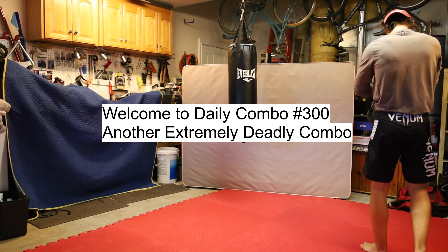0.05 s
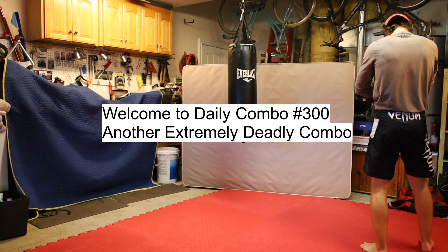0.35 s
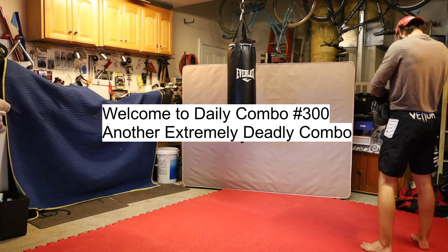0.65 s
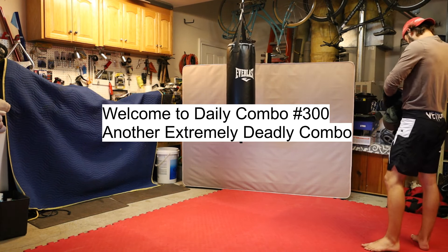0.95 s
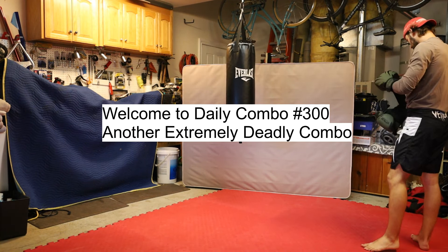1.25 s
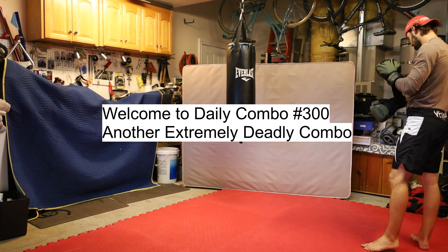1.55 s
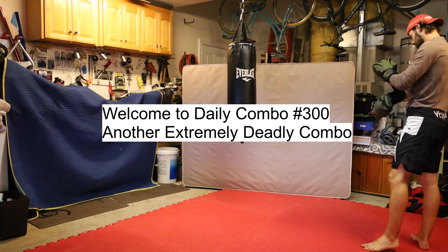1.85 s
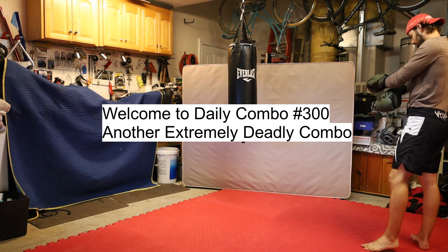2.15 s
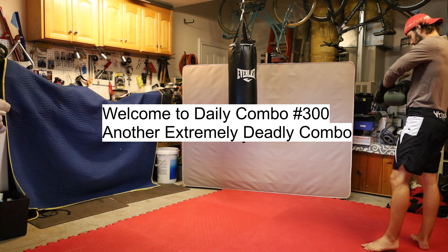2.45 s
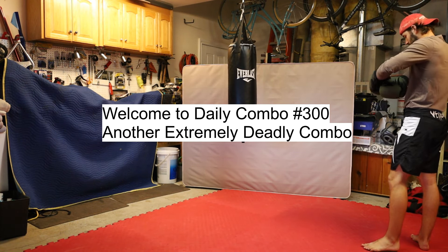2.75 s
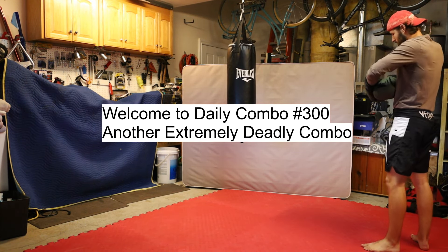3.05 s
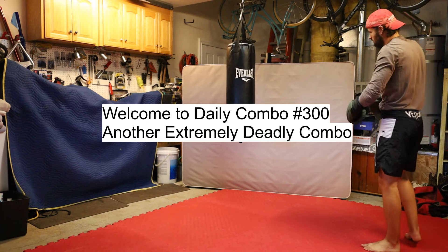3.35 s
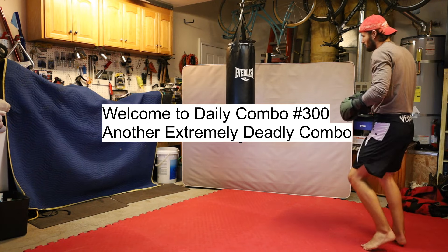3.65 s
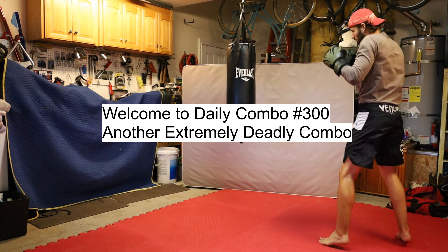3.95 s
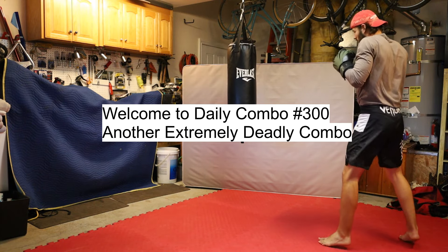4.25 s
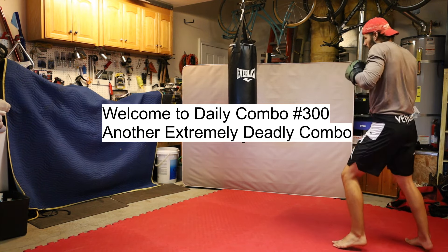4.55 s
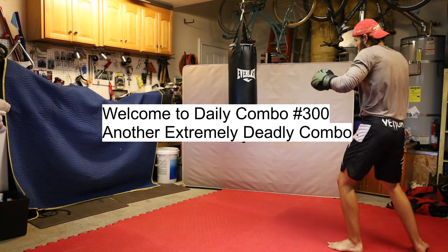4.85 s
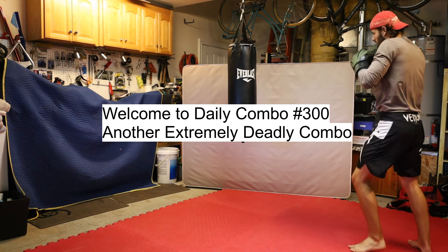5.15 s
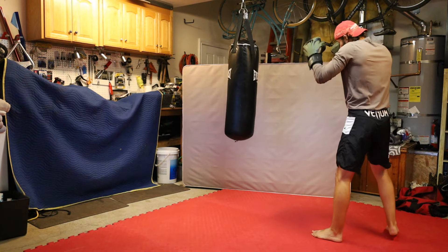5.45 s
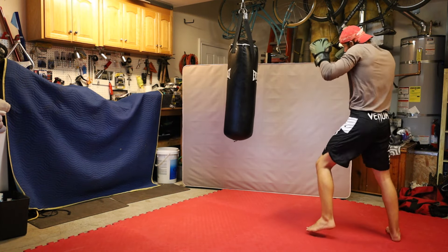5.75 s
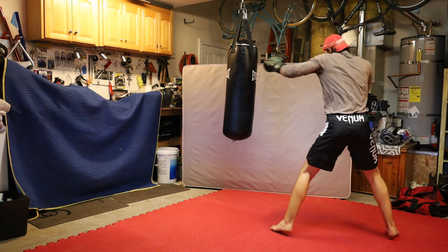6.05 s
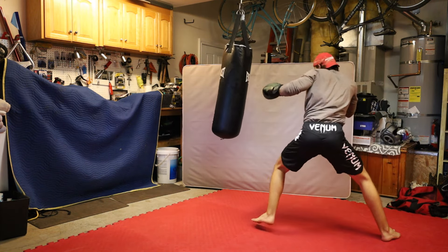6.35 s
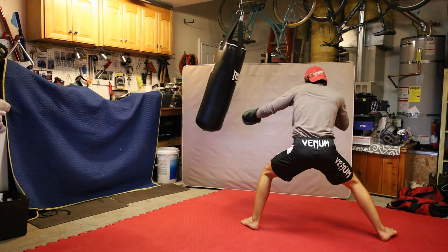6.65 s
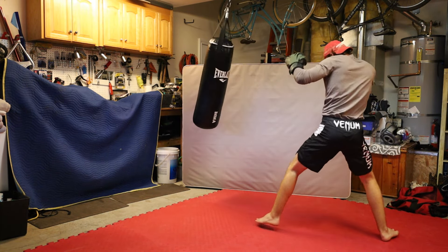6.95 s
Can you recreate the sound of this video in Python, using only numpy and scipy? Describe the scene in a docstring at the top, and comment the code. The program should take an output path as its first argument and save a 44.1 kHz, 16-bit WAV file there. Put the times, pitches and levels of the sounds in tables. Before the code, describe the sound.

After soft shuffling and glove handling in a garage, two loud punches slap into a heavy bag and its steel chain clinks.

```python
"""Heavy bag in a garage gym

A boxer rips open the hook-and-loop straps of his gloves, shuffles barefoot over foam mats and knocks
the gloves together. Two hard punches follow: each is a slap of squeezed air, a crack of leather and
the boom of the hanging bag. Its steel chain clinks and squeaks, and the ceiling mount rattles and
rumbles. Under the short, cluttered room sound lie still air and a faint mains hum."""
import sys
import numpy as np
from scipy import signal
from scipy.fft import rfft, irfft, next_fast_len
from scipy.io import wavfile

SR = 44100
rng = np.random.default_rng(int(sys.argv[2]) if len(sys.argv) > 2 else 0)


def to_wav(sig):
    """Store sig (one row per channel, or 1-D mono) as 16-bit WAV at the path in sys.argv[1].

    Samples outside -1..1 are clipped; the rate is SR.
    """
    pcm = np.clip(np.atleast_2d(sig), -1, 1) * 32767
    pcm = np.round(pcm).astype(np.int16)
    wavfile.write(sys.argv[1], SR, pcm.T)  # frames by channels


N = 312669
TIME = np.arange(N) / SR
STROKE = TIME[:SR // 2]   # time within one short sound

# one knock glove on glove, then two punches on the bag: (time [s], slap [dB], thump [dB], crack [dB])
GLOVE_HITS = [(4.1158, -18, -17, -38.5), (6.1682, 3.5, 2, -21.5), (6.5374, -4, -1.5, -22.5)]
# pressure pulses in one slap, contacts and near reflections: (delay [s], height [ratio], width [s])
SLAP_PULSES = [(0, 0.52, 0.0001), (.0021, 0.73, 0.00004), (.0025, 0.55, 0.00011), (.0068, 0.16, 0.00012),
               (.008, .55, .00005), (0.013, 0.19, 0.00014), (0.0267, 0.23, 0.000053)]
# tone of the leather crack: (frequency [Hz], level [dB])
LEATHER_EQ = [(40, -34), (120, 1.5), (280, -1), (500, -2), (900, -3), (1600, -5.5), (3500, -13),
              (7000, -19.5), (16000, -33)]
# boom of the bag and the garage air: (frequency [Hz], level [dB], t60 [s])
BOOM_MODES = [(55, -52, 0.41), (82.3, -22, 0.27), (102, -25.5, 0.2), (162.3, -18.5, 0.35),
              (205.6, -16, 0.14), (259, -16, 0.12), (292, -22, 0.26), (424, -27.5, 0.22), (447, -33, 0.2),
              (541, -38, 0.14), (692, -24, 0.14), (745, -27, 0.15)]


def glove_hits(low_cut_hz=170, crack_t60=0.31, boom_lag_s=0.00088):
    """The glove squeezes air out in sharp pulses, leather cracks, and the thump rings the low modes."""
    slaps, cracks, thumps = np.zeros((3, N))
    t = TIME[:SR // 3]
    for s, slap_db, thump_db, crack_db in GLOVE_HITS:
        for delay, height, width in SLAP_PULSES:
            add(slaps, s + delay, -from_db(slap_db) * height * t / width * np.exp(1 - t / width))
        leather = coloured(rng.standard_normal(len(t)), LEATHER_EQ)
        add(cracks, s, leather * from_db(crack_db - 60 * t / crack_t60))
        add(thumps, s + boom_lag_s, from_db([thump_db]))
    boom = sum(from_db(db) * ring(thumps, hz, t60) for hz, db, t60 in BOOM_MODES)
    return band(slaps, low_cut_hz, 11500, order=1), cracks, boom


# links snapping tight: (time [s], level [dB])
CHAIN_CLINKS = [(6.2086, -19), (6.308, -13.5), (6.3524, -20.5), (6.4212, -18.5), (6.439, -23), (6.462, -22),
                (6.599, -22), (6.6161, -15), (6.715, -45), (6.801, -34), (6.8218, -22), (6.9186, -27),
                (7.078, -34)]
# bright ring of a steel link: (frequency [Hz], level [dB], t60 [s])
LINK_MODES = [(3680, -2.5, 0.062), (3870, -13, 0.045), (4370, 1.5, 0.044), (5760, -29, 0.058),
              (6840, -24, 0.068), (7100, -14, 0.045), (8800, -8, 0.074), (9530, -11, .03), (9900, -16, .04),
              (11300, -3, 0.044), (11550, -5.5, 0.039), (12300, -11, 0.036), (13000, 2.5, .02),
              (14800, -2, 0.029), (15300, -16, 0.018)]
# a link squeaking in its hook: (time [s], length [s], pitch [Hz], level [dB])
HOOK_SQUEAKS = [(6.277, 0.03, 12080, -31), (6.87, 0.033, 6880, -44.5), (6.871, 0.06, 3480, -40)]


def chain(tick_db=-2, tick_t60=0.016, ring_db=-9, detune=0.022):
    """Each clink is a tick plus the ring of a slightly different link; the hook squeaks in pure tones."""
    out, t = np.zeros(N), TIME[:SR // 4]
    for s, db in CHAIN_CLINKS:
        steel = np.zeros(len(t))
        for hz, mode_db, t60 in LINK_MODES:
            strength, polarity, tuning = rng.standard_normal(3)
            tone = np.sign(polarity) * np.sin(2 * np.pi * hz * (1 + detune * tuning) * t)
            steel += tone * from_db(mode_db + 2 * strength - 60 * t / t60)
        tick = rms_one(band(rng.standard_normal(len(t)), 2100, 12300))
        tick *= from_db(tick_db - 60 * t / tick_t60)
        add(out, s, from_db(db) * (from_db(ring_db) * steel + tick))
    for s, length, hz, db in HOOK_SQUEAKS:
        gate = np.clip(np.minimum(t, length - t) / .003, 0, 1)
        add(out, s, from_db(db) * np.sin(2 * np.pi * hz * t) * gate)
    return out


# the bag dropping back into its chain: (time [s], rumble [dB], chatter [dB])
BAG_DROPS = [(6.413, -30, -28), (6.893, -38, -37)]
# midrange chatter of the bracket: (frequency [Hz], level [dB])
BRACKET_EQ = [(200, -10.5), (420, -5), (850, -7.5), (1300, -2), (1600, -0.5), (2000, -3), (2800, -5.5),
              (4000, -10.5), (5500, -17.5), (9000, -19.5), (16000, -32)]
# sparkle of slack links: (frequency [Hz], level [dB])
JINGLE_EQ = [(2000, -2), (4000, 9.5), (7000, 10), (12000, 7), (16000, -11)]
# low rumble of the joists: (frequency [Hz], level [dB])
JOIST_EQ = [(25, -31), (55, -14), (95, -5.5), (130, -1), (175, 2), (260, -12), (450, -6.5), (900, -28)]


def ceiling_mount(chatter_db=-24.5, clash_db=-27, clash_hz=2200, jolt_db=-30, jingle_t60=0.19):
    """The swinging bag makes the bracket chatter, the slack links jingle and the joists rumble."""
    chatter, clash, rumble = np.zeros((3, N))   # envelopes
    for s, *_ in GLOVE_HITS[1:]:   # the hits that land on the bag
        swing = swell(TIME - s, rise_s=0.11, hold_s=0.068, fade_t60=0.56)
        chatter += from_db(chatter_db) * swing
        clash += from_db(clash_db) * swing ** 3   # brighter at the height of the swing
        rumble += from_db(jolt_db) * swell(TIME - s, rise_s=0.01, fade_t60=0.21)
    for s, drop_rumble_db, drop_chatter_db in BAG_DROPS:
        load = swell(TIME - s, rise_s=0.011, hold_s=0.033, fade_t60=0.65)
        chatter = np.hypot(chatter, from_db(drop_chatter_db) * load)
        rumble = np.hypot(rumble, from_db(drop_rumble_db) * load)
    jingle = from_db(-18) * chatter
    for s, db in CHAIN_CLINKS:   # slack links jingle on softly after each clink
        add(jingle, s, from_db(db - 18.5 - 60 * STROKE / jingle_t60))
    bracket = chatter * coloured(grains(N, 5000, 0.95), BRACKET_EQ)
    bracket_ring = rms_one(ring(grains(N, 3400, 2.5), hz=1450, t60=0.0074))
    bracket += from_db(-14) * chatter ** 0.83 * bracket_ring   # the ring outlasts the chatter
    steel = clash * rms_one(band(grains(N, 2500, 1.3), clash_hz / 1.8, clash_hz * 1.54))
    links = jingle * coloured(grains(N, 450, 2.7), JINGLE_EQ)
    joists = rumble * coloured(rng.standard_normal(N), JOIST_EQ)
    return bracket + steel + links + joists


# hook-and-loop straps ripping open:
# (time [s], length [s], start level [dB], end level [dB], centre [Hz], hiss [dB], body [dB])
STRAP_RIPS = [(0.859, 0.08, -30.5, -25, 2550, -8, -12.5), (1.022, 0.0095, -28, -24, 2490, -12.5, -12.5),
              (1.161, 0.075, -28, -19, 2030, -3, -8)]


def straps():
    """The hooks tear loose in a coarse crackle that grows with the pull until the strap comes free."""
    out = np.zeros(N)
    for s, length, start_db, end_db, hz, hiss_db, body_db in STRAP_RIPS:
        pull = from_db(np.interp(STROKE, [0, length], [start_db, end_db]))
        crackle = friction(hz, hiss_db, body_db, per_s=1500, spread_db=3.0, width=1.484,
                           body_hz=(450, 800), body_order=1)
        add(out, s, crackle * pull * swell(STROKE, rise_s=0.0021, hold_s=length, fade_t60=0.19))
    return out


# gloves and feet patting down: (time [s], snap [dB], brush [dB], centre [Hz], hiss [dB], body [dB])
CONTACT_PATS = [(.053, -23, -44.5, 1700, -3, -8), (1.033, -17, -37, 2510, -2, -6.5),
                (2.107, -33, -47.5, 1280, -16, -4), (2.31, -23, -38, 1620, -16.5, -22),
                (3.2019, -21, -36, 3300, -7.5, -16), (3.3644, -21.5, -42.5, 2130, -0.5, -8),
                (3.609, -24.5, -43, 1250, -10, -2), (3.981, -26.5, -42, 1480, -0.5, -6),
                (4.272, -34, -52, 1400, 7, -16), (4.353, -23.5, -38, 1710, 0, -10),
                (5.031, -29.5, -43.5, 1700, -0.5, -10), (5.1321, -14.5, -36, 1130, -7, -5.5),
                (5.365, -23, -48, 1440, -1, -7), (5.596, -22, -38, 1130, -12.5, -10.5),
                (6.081, -25, -35, 1260, -14, -7)]
# fine top-end hiss of skin and vinyl: (frequency [Hz], level [dB])
SHEEN_EQ = [(300, -40), (1500, -32), (3000, 2), (5500, 1), (8000, 1.5), (12000, -8), (16000, -9.5)]


def pats(snap_t60=0.0057):
    """A glove or sole touches with a click and a quick double snap, then brushes along."""
    out, touch = np.zeros(N), signal.unit_impulse(len(STROKE))
    for s, snap_db, brush_db, hz, hiss_db, body_db in CONTACT_PATS:
        click = ring(touch, hz, t60=0.0018) + from_db(hiss_db + 3) * band(touch, 5000, 16000)
        add(out, s, from_db(snap_db - 1.5) * click)
        # the edge lands first, the rest of the surface just after and brighter
        for delay_s, trim_db, pitch_ratio in ((0, -3, 1), (0.0044, -2, 1.56)):
            snap = friction(hz * pitch_ratio, hiss_db, body_db, per_s=30000, spread_db=-1.5,
                            width=1.39, hiss_eq=SHEEN_EQ)
            add(out, s + delay_s, snap * from_db(snap_db + trim_db - 60 * STROKE / snap_t60))
        brush = friction(hz, hiss_db, body_db, per_s=3700, spread_db=5.0, width=1.64)
        add(out, s, brush * from_db(brush_db) * swell(STROKE, rise_s=0.0032, fade_t60=0.32))
    return out


# bright swishes of bare soles and glove cuffs: (time [s], rise [s], level [dB], centre [Hz], body [dB])
SLIDE_SWISHES = [(.481, 0.025, -42.5, 1050, -8), (.655, 0.036, -45, 1350, -25),
                 (2.405, 0.079, -39, 1830, -7.5), (3.274, 0.021, -40, 1370, -14),
                 (3.515, 0.059, -46, 1110, -9), (3.951, 0.047, -36.5, 1250, -10),
                 (4.07, 0.03, -42.5, 1510, -17), (4.375, 0.036, -44, 1630, -17),
                 (4.443, 0.019, -33.5, 1520, -22), (4.741, 0.013, -36.5, 1800, -9.5),
                 (4.849, 0.008, -39.5, 1430, -9), (5.234, 0.016, -31.5, 1740, -19)]


def slides():
    """A sole or cuff speeds up over its surface and hisses to a stop."""
    out = np.zeros(N)
    for s, rise_s, db, hz, body_db in SLIDE_SWISHES:
        swish = friction(hz, hiss_db=0.26, body_db=body_db, per_s=8000, spread_db=3.5,
                         width=1.64, hiss_eq=SHEEN_EQ)
        add(out, s, swish * from_db(db) * swell(STROKE, rise_s, fade_t60=0.25))
    return out


# hollow, half-pitched scuffs of soles and vinyl: (time [s], t60 [s], level [dB], centre [Hz])
RUB_SCUFFS = [(.495, 0.3, -47, 935), (2.108, 0.27, -47.5, 2000), (3.75, 0.78, -52, 1710),
              (4.18, 0.85, -38.5, 1350), (4.451, 0.87, -45, 1490), (4.869, .9, -54, 1600),
              (5.134, 0.082, -29.5, 1300), (5.136, 0.091, -29, 3440), (5.4, 0.99, -53.5, 1590),
              (5.596, 0.29, -36, 1050)]


def rubs(rise_share=0.023):
    """Skin or vinyl sticks and slips in a narrow resonance; longer rubs have a softer attack."""
    out = np.zeros(N)
    for s, t60, db, hz in RUB_SCUFFS:
        scuff = friction(hz, hiss_db=-15, body_db=-16, per_s=2500, spread_db=5.0, width=1.16)
        add(out, s, scuff * from_db(db) * swell(STROKE, rise_share * t60, t60))
    return out


# cloth moves: (time [s], rise [s], level [dB])
SLEEVE_RUSTLES = [(.73, 0.1, -44), (1.498, 0.0047, -52), (1.589, 0.024, -50.5), (1.741, 0.13, -60.5),
                  (2.856, .037, -48), (3.168, 0.008, -42.5), (3.7, 0.019, -43.5), (4.19, 0.13, -43),
                  (4.6, 0.05, -47), (5.124, 0.0019, -38), (5.744, 0.0087, -45.5), (5.96, 0.037, -54.5),
                  (6.095, 0.011, -38.5)]


def sleeves():
    """Cloth rustles with each arm movement."""
    out = np.zeros(N)
    for s, rise_s, db in SLEEVE_RUSTLES:
        cloth = friction(hz=1860, hiss_db=-6, body_db=-10.5, per_s=4000, spread_db=3.5, width=1.92)
        add(out, s, cloth * from_db(db) * swell(STROKE, rise_s, fade_t60=0.36))
    return out


# bare feet landing on the mats: (time [s], thud [dB], floor ring [dB])
MAT_STEPS = [(1.239, -58, -41), (2.478, -64, -50.5), (2.821, -53.5, -55), (4.13, -46, -26.5),
             (4.44, -49.5, -59), (5.298, -59, -66), (5.691, -57, -57)]
# muffled tone of a footfall: (frequency [Hz], level [dB])
THUD_EQ = [(25, -29), (55, 2), (100, -5), (170, -13), (260, -7.5), (500, 3.5), (1200, -38)]


def footsteps(floor_hz=162.6, floor_t60=0.16):
    """Soft, dull thuds on foam; a heavy landing also sets the floor ringing."""
    thuds, landings = np.zeros((2, N))
    for s, db, ring_db in MAT_STEPS:
        thud = coloured(rng.standard_normal(len(STROKE)), THUD_EQ)
        add(thuds, s, thud * from_db(db) * swell(STROKE, rise_s=0.0099, fade_t60=0.6))
        add(landings, s, from_db([ring_db]))
    return thuds + band(ring(landings, floor_hz, floor_t60), 90, 600, order=1)


# hiss of catching fibres: (frequency [Hz], level [dB])
FIBRE_EQ = [(300, -42), (1000, -85), (3000, 1.5), (5500, 2), (8000, -0.5), (12000, -9), (16000, -17)]


def friction(hz, hiss_db, body_db, per_s, spread_db, width,
             body_hz=(170, 790), body_order=2, hiss_eq=FIBRE_EQ):
    """Fibres catch and let go: grains through a resonance, with hiss above and a hollow body below."""
    size = len(STROKE)
    resonance = rms_one(band(grains(size, per_s, spread_db), hz / width, hz * width))
    hiss = coloured(grains(size, per_s, spread_db), hiss_eq)
    body = rms_one(band(rng.standard_normal(size), *body_hz, order=body_order))
    return resonance + from_db(hiss_db) * hiss + from_db(body_db) * body


# reverb time of the garage: (frequency [Hz], t60 [s])
REVERB_DECAY = [(100, 0.24), (500, 0.35), (1500, 0.37), (4000, 0.4), (9000, 0.2), (16000, 0.32)]
# tone of what the clutter sends back: (frequency [Hz], level [dB])
REVERB_EQ = [(100, 0.5), (2500, -0.5), (7000, -1.5), (16000, -1.5)]


def garage_tail(build_s=0.00053, energy_db=-1.0):
    """Stereo response of the cluttered room: builds up quickly, dies soonest in the treble."""
    t = TIME[:SR * 2 // 5]
    tail = np.zeros((2, len(t)))
    for hz, noise in diffuse_bands(len(t)):
        t60 = at_hz(REVERB_DECAY, hz)
        tail += noise * from_db(at_hz(REVERB_EQ, hz) - 60 * t / t60) / np.sqrt(t60)
    tail *= 1 - np.exp(-t / build_s)
    return from_db(energy_db) * rms_one(tail) / np.sqrt(len(t))


def in_garage(x, direct_db, room_db, left_lag_s, sway_hz):
    """A source right of centre arrives late on the left; its reflections shift as it moves."""
    direct = np.array([np.interp(TIME - left_lag_s, TIME, x), x])
    sway = 2 * np.pi * sway_hz * TIME   # crossfades between two reverb tails
    room = sum(signal.fftconvolve((x * share)[None], garage_tail(), axes=1)[:, :N]
               for share in (np.cos(sway), np.sin(sway)))
    return from_db(direct_db) * direct + from_db(room_db) * room


# bed of still air: (frequency [Hz], level [dB])
AIR_EQ = [(25, -32), (120, -7), (210, -13), (300, -10.5), (600, -11), (5000, -20), (16000, -32)]
# mains hum of appliances: (frequency [Hz], rms level [dB])
HUM_PARTIALS = [(119.5, -72), (240.5, -73.5), (360.5, -74), (599, -72.5)]


def room_tone(air_db=-57):
    """Still air from all sides and a faint mains hum in the centre."""
    air = rms_one(sum(from_db(at_hz(AIR_EQ, hz)) * noise for hz, noise in diffuse_bands(N)))
    hum = sum(np.sqrt(2) * from_db(db) * np.sin(2 * np.pi * (hz * TIME + rng.random()))
              for hz, db in HUM_PARTIALS)
    return from_db(air_db) * air + hum


# stereo width of sound from all sides: (frequency [Hz], side minus mid [dB])
STEREO_WIDTH = [(50, -35), (120, -8), (280, -12.5), (700, -6.5), (1400, -6.5), (2800, 2.5), (6000, -1.5),
                (14000, 1.5)]


def diffuse_bands(size):
    """Half-octave bands of sound from all sides, as (Hz, stereo noise); nearly mono in the bass."""
    edges = 22 * 2 ** (np.arange(21) / 2)
    white = rng.standard_normal((2, 2, size))
    for k, (low, high) in enumerate(zip(edges, edges[1:])):
        mid, side = band(white[k % 2], low, high)
        hz = np.sqrt(low * high)
        width = from_db(at_hz(STEREO_WIDTH, hz))
        yield hz, np.array([mid + width * side, mid - width * side]) / np.hypot(1, width)


def grains(size, per_s, spread_db):
    """Random tiny contacts of uneven strength; rms 1."""
    strength = from_db(spread_db * np.minimum(rng.exponential(1, size), 4))
    return rms_one(strength * rng.choice([-1, 1], size) * (rng.random(size) < per_s / SR))


def ring(clicks, hz, t60):
    """A unit click sets a sine of height 1 ringing."""
    r, w = from_db(-60 / (t60 * SR)), 2 * np.pi * hz / SR
    return signal.lfilter([0, np.sin(w)], [1, -2 * r * np.cos(w), r * r], clicks + 1e-18)


def swell(t, rise_s, fade_t60, hold_s=0):
    """Envelope: a straight rise, a hold, an exponential fade."""
    return np.clip(t / rise_s, 0, 1) * from_db(-60 * np.maximum(t - rise_s - hold_s, 0) / fade_t60)


def coloured(x, eq):
    """Shape a steady signal with an EQ curve; rms 1."""
    size = next_fast_len(len(x))
    gain = from_db(at_hz(eq, np.fft.rfftfreq(size, 1 / SR)))
    return rms_one(irfft(rfft(x, size) * gain, size)[:len(x)])


def band(x, low_hz, high_hz, order=2):
    """Causal band-pass."""
    sos = signal.butter(order, [low_hz, min(high_hz, SR * 9 / 20)], "band", fs=SR, output="sos")
    return signal.sosfilt(sos, x + 1e-18)


def at_hz(points, hz):
    """Read a table on a log-frequency axis."""
    f, value = np.transpose(points)
    return np.interp(np.log(hz + 1e-3), np.log(f), value)


def add(out, s, sound):
    """Mix a sound in at s seconds."""
    i = max(round(s * SR), 0)
    out[i:i + len(sound)] += sound[:max(N - i, 0)]


def from_db(db):
    """Decibels to gain."""
    return 10 ** (np.asarray(db) / 20)


def rms_one(x):
    """Scale to unit power."""
    return x / np.sqrt(np.mean(x ** 2) + 1e-20)


def scene(pan_db=0.53):
    """Punches up front and centred, boxer and hardware slightly right, room tone underneath."""
    slaps, cracks, boom = glove_hits()
    moves = slides() + sleeves() + rubs() + straps() + footsteps()
    boxer = in_garage(moves, direct_db=-4.0, room_db=-2.5, left_lag_s=.00007, sway_hz=6)
    boxer += in_garage(pats(), direct_db=-3.0, room_db=-3.5, left_lag_s=.00007, sway_hz=3.1)
    hardware = chain() + ceiling_mount()
    hardware = in_garage(hardware, direct_db=-3.0, room_db=-2.0, left_lag_s=.00001, sway_hz=8)
    punches = in_garage(slaps + cracks, direct_db=3.5, room_db=2.5, left_lag_s=0, sway_hz=0.6975)
    punches = band(punches + boom, 99, 20000)   # the bag is too small to radiate the deepest bass
    return (boxer + hardware) * from_db([[-pan_db], [pan_db]]) + punches + room_tone()


def record(dry, stopband_hz=16800):
    """The hardest peaks clip, then a steep low-pass takes off the very top."""
    low_pass = signal.cheby2(16, 60, stopband_hz, fs=SR, output="sos")
    return signal.sosfilt(low_pass, np.clip(dry, -1, 1))


dry = scene()
out = record(dry)
to_wav(out)
```